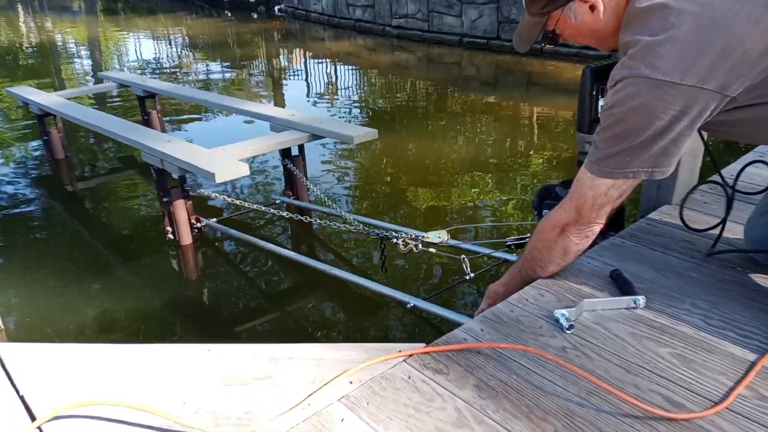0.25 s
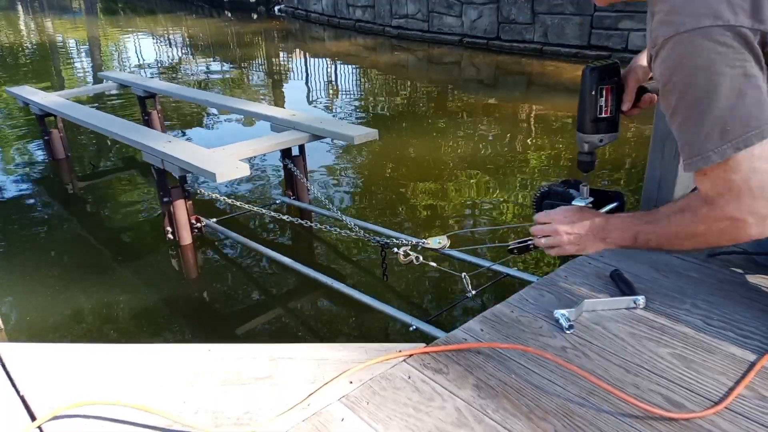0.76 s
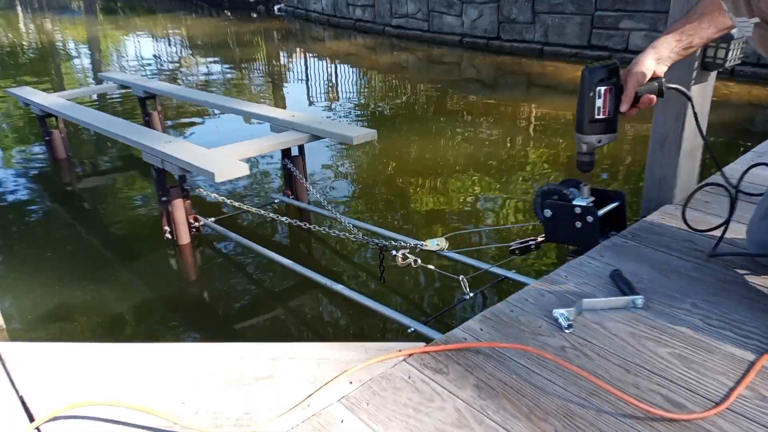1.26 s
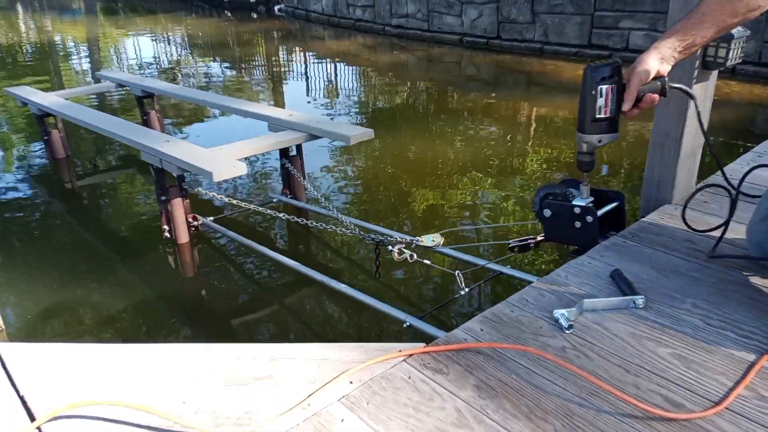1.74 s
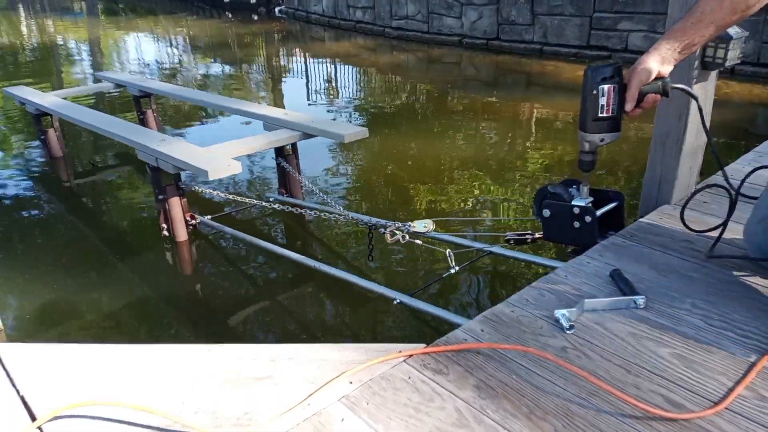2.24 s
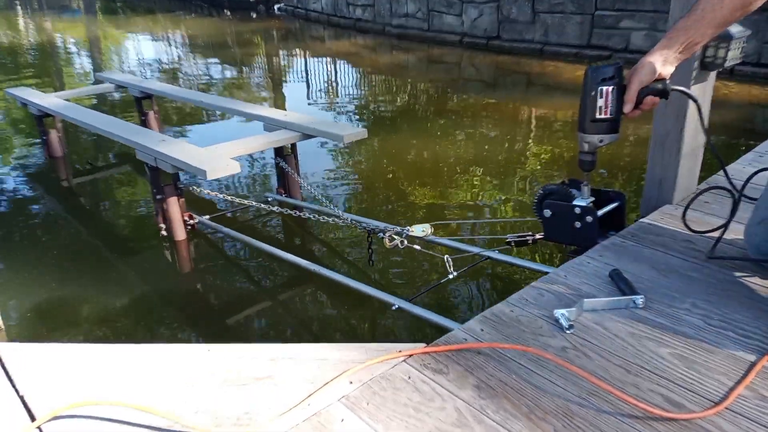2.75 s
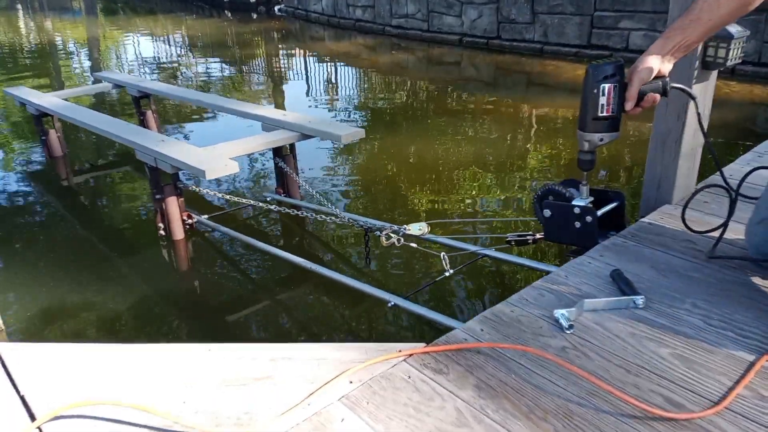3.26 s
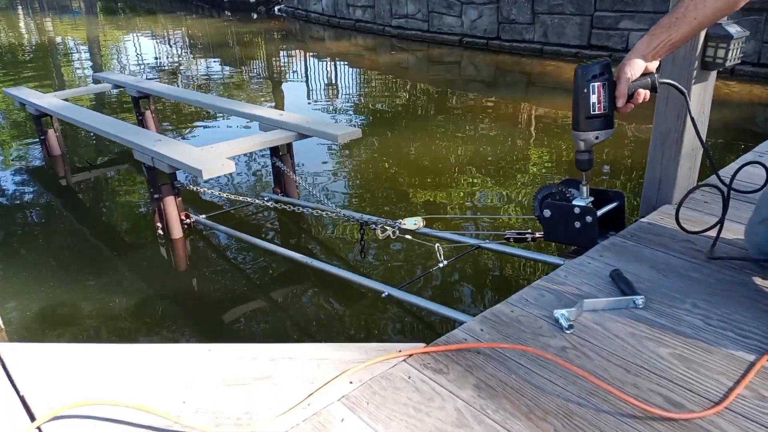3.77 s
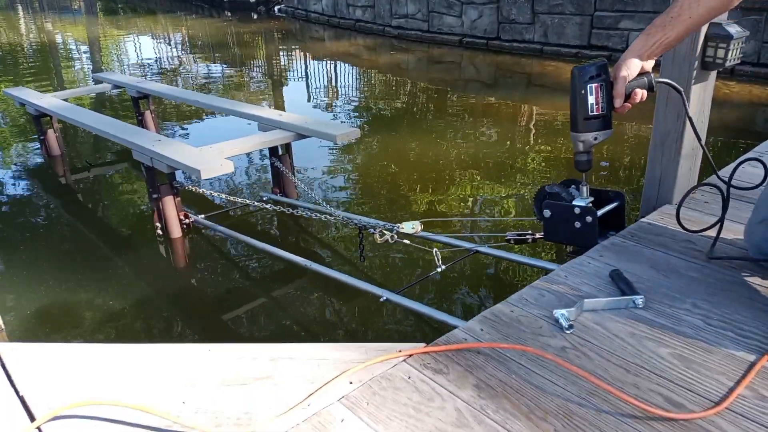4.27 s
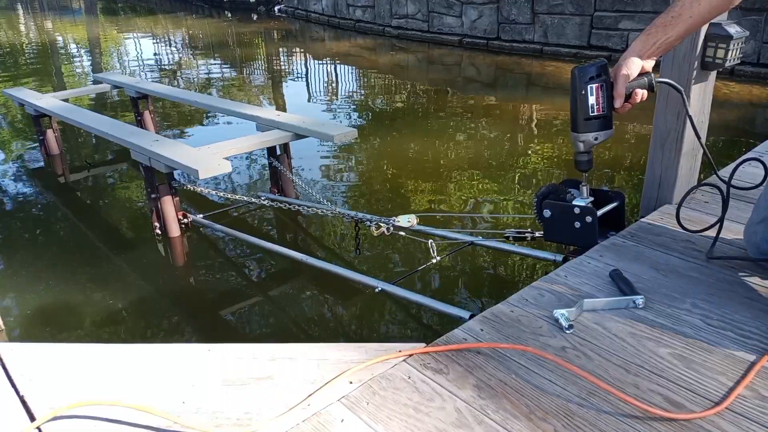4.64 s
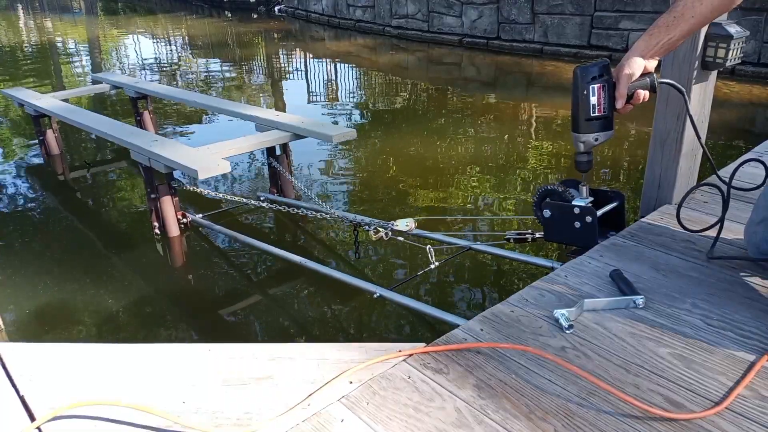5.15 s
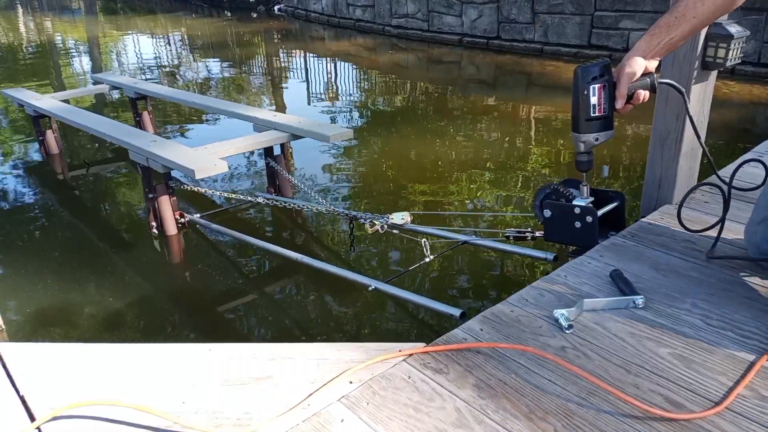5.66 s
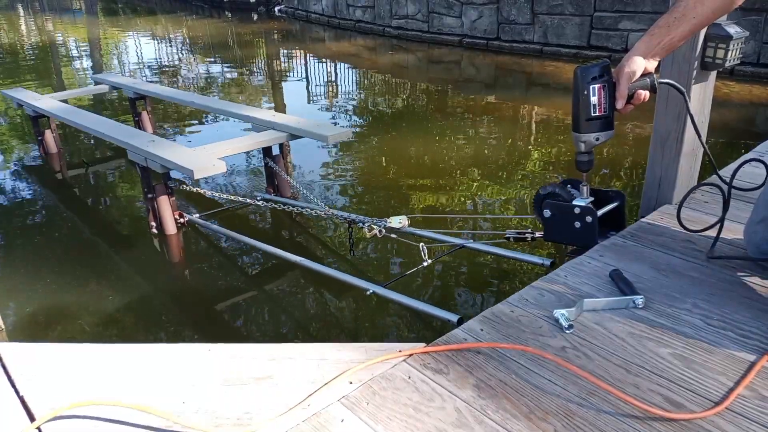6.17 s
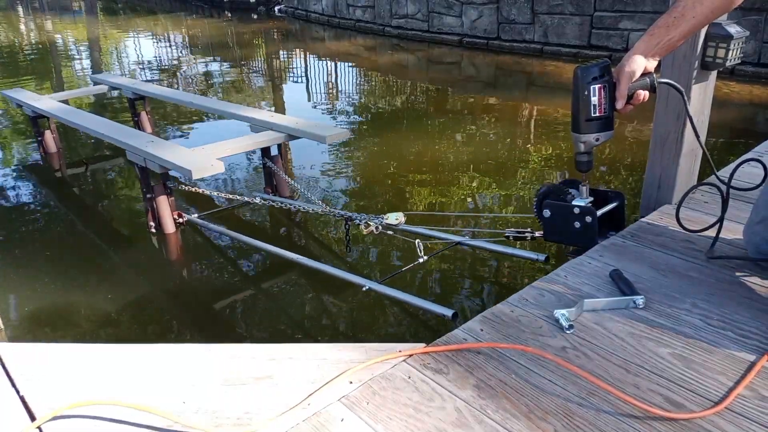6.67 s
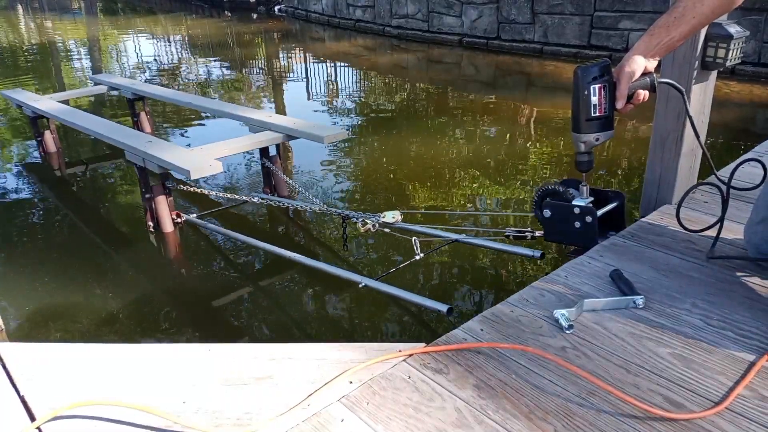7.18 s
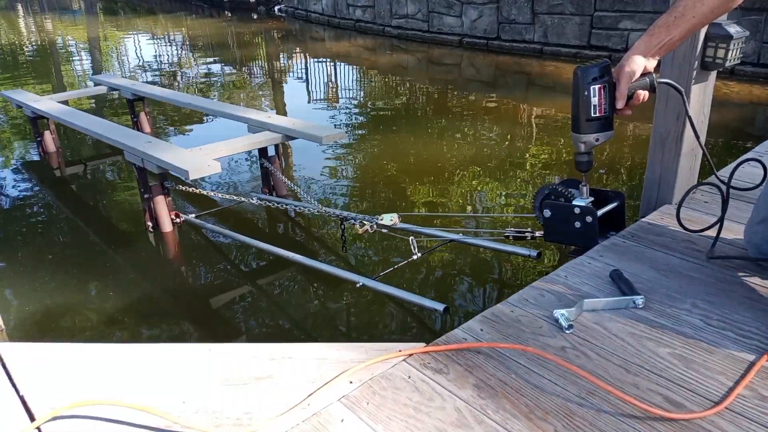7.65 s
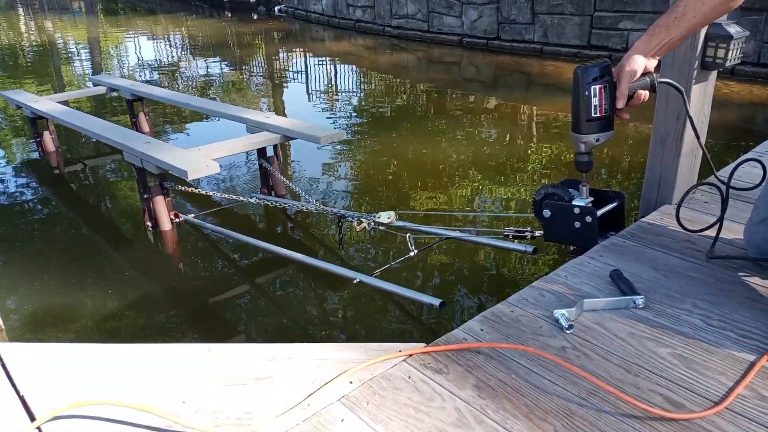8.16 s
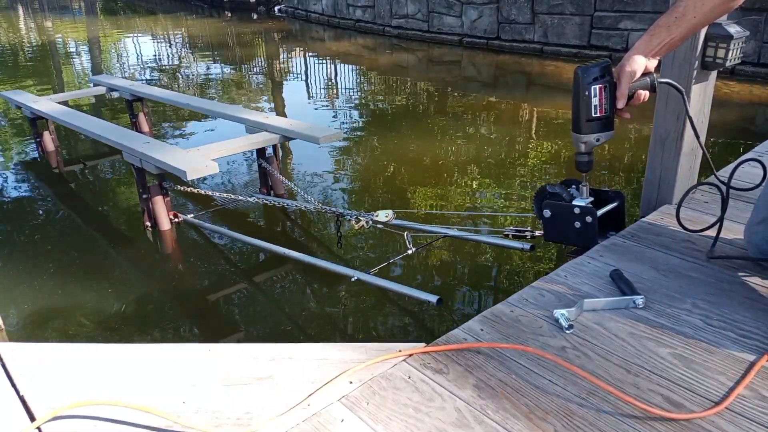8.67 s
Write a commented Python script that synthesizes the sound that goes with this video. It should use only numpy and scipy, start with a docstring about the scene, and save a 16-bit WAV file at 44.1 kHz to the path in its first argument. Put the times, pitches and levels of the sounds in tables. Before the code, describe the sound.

Close stereo sound of a corded electric drill turning a winch on a wooden dock. A thin, high whine rides on bright fan hiss, with low grinding rumble and gear chatter. After about three seconds the load eases, the whine rises slightly and the rumble lightens. Near the end the trigger is released, the motor glides down, and a few dull knocks sound in the boards.

```python
"""On a wooden dock a corded drill drives a winch, heard by two microphone ports.
The drill whines on multiples of its motor speed, over hiss made from noise shaped for each port.
Noise ringing the winch and boards, spindle tones and tooth chatter are strong at first, then light.
The trigger is released and the motor coasts down, with a few dull knocks.
A faint low hum and a soft background lie underneath."""
import sys
import numpy as np
from scipy import signal
from scipy.fft import rfft, irfft, next_fast_len
from scipy.io import wavfile
from scipy.ndimage import uniform_filter1d

SR = 44100
rng = np.random.default_rng(int(sys.argv[2]) if len(sys.argv) > 2 else 0)


def transcribe(u):
    """Save the signal u as a 16-bit wav file named by the first command-line argument.

    u: samples, shape (n,) or (channels, n), limited to [-1, 1]; the rate is SR.
    q: integer samples, one column per channel.
    """
    v = np.clip(np.atleast_2d(u).T, -1, 1)
    q = np.round(v * 32767).astype(np.int16)
    wavfile.write(sys.argv[1], SR, q)


N = 393362
T = np.arange(N) / SR  # time of every sample [s]

# Motor speed while the trigger is held: (time [s], speed [turns per s])
MOTOR_SPEED = [(0, 367), (.45, 363.6), (.62, 362.7), (.8, 362.4), (1.1, 368.6), (1.2, 372.8), (1.45, 376.6),
               (1.7, 378.4), (2.0, 376), (2.3, 374), (2.6, 370), (2.82, 368.7), (3.0, 370.8), (3.4, 387),
               (3.6, 390.8), (3.8, 393), (4.2, 394), (4.5, 392.8), (4.8, 393.9), (5.1, 393.9), (5.5, 392),
               (5.75, 391.9), (5.9, 393.4), (6.1, 392.9), (6.3, 393.3), (6.65, 391.8), (7.05, 391.9),
               (7.3, 390.4), (7.56, 389.7)]
# Strength of the fan blade tone: (time [s], level [dB])
BLADE_LEVEL = [(0, -39), (.55, -38.5), (.7, -35.5), (.82, -39), (1.0, -39), (1.12, -34.5), (1.5, -32.5),
               (2.1, -32.5), (2.32, -37), (2.75, -33.5), (3.0, -35), (3.32, -30.5), (4.2, -29.5), (5, -31),
               (5.3, -29.5), (5.9, -31.5), (6.7, -31), (7, -33), (7.35, -30.5), (7.56, -31)]
# Powered tones on multiples of the motor speed, against the blade tone:
# (multiple [-], left level [dB], right level [dB], change under full load [dB])
POWERED_TONES = [(1, -36, -36, 0), (6, -31, -37, 0), (8, -25, -29, 0), (12, -23, -30, 2),
                 (14, -14, -29, -7), (15, 0, -13, 0), (30, -28, -24, 0)]
# Swelling of the second blade harmonic at the right port: (time [s], added level [dB])
RIGHT_OVERTONE = [(.5, 9), (1, 9), (1.4, 3), (1.8, 9), (2.6, 6), (3.4, 12), (4, 7), (4.3, 0), (5, -3),
                  (5.5, 0), (7.56, 3)]
# Tones while coasting: (multiple of motor speed [-], left level [dB], right level [dB],
# loudest time [s], loss one second away [dB])
COASTING_TONES = [(7, -58, -61, 7.7, 250), (7, -63, -63.5, 8.27, 45), (8, -61, -65, 7.95, 120),
                  (14, -62, -65, 8.3, 40), (15, -51, -54, 8.06, 140), (30, -57, -64, 8.25, 50)]
# Color of the air hiss at each port: (frequency [Hz], relative level [dB per Hz])
LEFT_HISS = [(300, -27), (800, -22), (1700, -14.5), (2000, -17.5), (2850, -15.5), (3150, -11.5),
             (3550, -13.5), (3750, -6.5), (4100, -10.5), (4700, -10.5), (4830, -12.5), (5500, -1.5),
             (6300, -5.5), (7050, 3), (8000, -6), (8600, -12.5), (9050, -8.5), (9800, -18.5), (10600, -19),
             (12300, -23.5), (14300, -18), (15500, -22)]
RIGHT_HISS = [(300, -33), (1000, -17.5), (1300, -20), (1700, -17.5), (2300, -20.5), (3150, -14),
              (3850, -15), (4300, -13), (4700, -15), (5400, -13), (5800, -14), (6500, -19.5), (6900, -6),
              (7600, -19.5), (8450, -8), (9300, -8.5), (10000, -3.5), (10500, -1.5), (11000, -7),
              (12200, -10), (12700, -15), (15500, -21.5)]
# How alike the two ports sound: (frequency [Hz], likeness [0-1])
PORT_LIKENESS = [(100, 0.85), (300, 0.82), (700, 0.5), (1500, 0.94), (3000, 0.83), (3700, 0.56),
                 (4500, 0.59), (7000, 0.03), (15000, 0.1)]
# Strain of the winch, then its light running: (time [s], rumble level [dB])
RUMBLE_LEVEL = [(0, -39.5), (.7, -40), (1.1, -41.5), (1.6, -41), (2.7, -38), (3.15, -40.5), (3.3, -47.5),
                (3.5, -50.5), (5.9, -50.5), (7.56, -49)]
# What winch and boards ring with: (frequency [Hz], basic width [Hz], relative level [dB])
BODY_MODES = [(175.2, 26, -7), (235.9, 19.4, -1), (252.5, 17.5, -0.5), (317.5, 34.5, -4.5), (342.4, 39, -8),
              (378, 30, -17), (572.8, 46, -5), (608.7, 42, -3.5), (655.7, 75, -2), (940, 270, -9.5)]
# Left lean of the upper body modes, turned over for the right: (frequency [Hz], level [dB])
BODY_LEAN = [(400, 0), (620, 0.5), (950, 3.5)]
# Low multiples of the spindle turn, felt as a thump: (multiple [-])
THUMP_ORDERS = [2, 3, 4, 5, 6, 7]
# Strength of each of those multiples: (relative level [dB])
THUMP_LEVELS = [-14, -5.5, 5, 10, -1, -2.5]
# Higher spindle multiples humming in the boards:
# (multiple [-], relative level loaded [dB], relative level running light [dB])
BOARD_TONES = [(8, -13, -16), (9, -3, -15), (10, -8, -13), (11, -9, -6), (12, 0, -2), (13, -2, -1),
               (14, -10, -16), (16, -7, -15), (17, -9, -13), (18, -8, -18), (20, -13, -20)]
# Single spindle multiples swell or sink: (multiple [-], center [s], half length [s], change [dB])
SPINDLE_SWELLS = [(3, .3, 1.0, 6), (4, .1, 0.63, -4), (4, 1.9, 1.0, 3.5), (4, 4.3, .9, -5),
                  (5, 1.5, 1.1, -2), (5, 2.5, .45, 3), (5, 6.7, 0.83, 4.5), (9, 0.22, .5, 5.5),
                  (9, 1.51, 0.32, 7.5), (9, 2.2, .35, -9), (9, 3.3, .15, 13), (6, .2, .6, 9),
                  (7, .4, .7, 7), (12, 0.14, .4, 3), (12, 7.2, 0.19, 9.5), (13, 8.3, .35, 10),
                  (16, 2.6, 0.36, 6.5), (18, 2.7, 0.31, 5)]
# Color of the gear tooth rattle: (frequency [Hz], left [dB per Hz], right [dB per Hz])
TEETH_COLOR = [(406, -4, -16), (834, 1.5, -2.5), (1390, -5, -4.5), (2780, -1.5, -5.5), (5700, 2.5, -1.5),
               (6760, 9, -9.5), (9700, -4, 2), (12700, -15, -4), (15500, -10, -23)]
# What a ticking tooth rings with: (frequency [Hz], width [Hz], left level [dB], right level [dB])
TICK_MODES = [(1714, 72, -10, -7.5), (3110, 110, -0.5, -11), (4470, 350, -2.5, -6), (9670, 210, -10, 8),
              (10900, 250, -20, 2), (12100, 300, -14, 3), (13400, 600, -10, 1)]
# Brief jolts through the boards: (time [s], half length [s], rumble change [dB], thump change [dB])
BOARD_JOLTS = [(3.1, 0.11, 0.5, 5), (5.277, 0.092, 1, 5), (5.64, .15, 0.5, 6), (6.073, 0.048, 6, 6),
               (6.714, 0.093, 1.5, 7), (7.05, 0.11, -2, 6), (7.628, 0.093, 4.5, 10), (7.857, .03, 3, 2),
               (8.2, 0.28, 0.5, 0)]
# Dull knocks in the boards: (time [s], level [dB])
BOARD_KNOCKS = [(7.609, -41), (8.056, -41), (8.288, -37.5), (8.299, -38), (8.676, -48)]
# Strength of the low hum: (time [s], level [dB])
HUM_LEVEL = [(0, -57), (4.3, -56), (4.8, -57), (5.8, -59), (6.4, -63), (7, -63), (7.5, -55), (8.92, -55.5)]
# Color of the soft background: (frequency [Hz], relative level [dB per Hz])
OUTDOOR_COLOR = [(33, -36), (48, 6), (80, 9.5), (150, 3), (500, -7), (1500, -32), (16000, -37)]

RELEASE_S = 7.56  # the trigger is let go
DRAG_PER_S = 0.635  # coasting loss in step with speed
FRICTION_TURNS = 60  # speed at which friction equals that drag [turns per s]
BLADES = 15  # fan blades
GEAR = 19.2  # motor turns to one spindle turn
LAG = 6.4  # delay of the right port [samples]
AIR_DB, AIR_LOADED_DB = -29, -1.26  # hiss running free, change at full strain
FLICKER_DB, FLICKER_LOADED_DB = 0.2, 1  # hiss flicker, added flicker at full strain
THUMP_DB, CHATTER_DB = -9, 6  # against the rumble
UPPER_HZ, UPPER_LOADED_DB = 450, 2  # body modes above this gain under load
# dB lost for each dB of slowing; the board tones and upper modes lose theirs on top of the rumble's
AIR_SPEED_LAW, RUMBLE_SPEED_LAW, THUMP_SPEED_LAW = 1.87, 0.99, 2.2
BOARD_TONE_SPEED_LAW, UPPER_SPEED_LAW = 6.5, 0.39
KNOCK_DAMPING = 2.2  # ring width of a knock against the basic width
KNOCK_DULL_DB, KNOCK_RISE_S = -7, 0.004  # change per octave, rise time
HUM_HZ, HUM_WANDER_HZ = 129.2, 3.2  # pitch, upper rate of its wandering
OUTDOORS_DB = -59
EDGE_HZ = 15760  # upper band limit


def armature():
    """Motor speed under power, then slowed by drag and friction; also the slowing in dB."""
    powered = uniform_filter1d(curves(MOTOR_SPEED)[0], size=3500, mode="nearest")
    kept = np.exp(-DRAG_PER_S * np.maximum(T - RELEASE_S, 0))
    speed = (powered + FRICTION_TURNS) * kept - FRICTION_TURNS
    return speed, 20 * np.log10(speed / powered)


def whine(speed):
    """Fan blades, commutator and imbalance sing on multiples of the motor turn."""
    turns = np.cumsum(speed * (1 + 0.00025 * drift(hz=30))) / SR
    turns = np.array([turns, turns - speed * LAG / SR])  # the right port trails
    return np.sqrt(2) * (powered_tones(turns) + coasting_tones(turns))


def powered_tones(turns):
    """Tones under power waver with chance and the spindle turn, then collapse after release."""
    # the operator's body shields the drill, then moves aside
    blade_db = curves(BLADE_LEVEL)[0] + ramp(0.3, 0.49, 23) - 23
    blade_db += ramp(7.625, 7.74, -48)
    spindle_db = 0.55 * np.cos(2 * np.pi * turns / GEAR)
    out = np.zeros((2, N))
    for order, left_db, right_db, loaded_db in POWERED_TONES:
        side_db = np.array([left_db + 0 * T, right_db + 0 * T])
        if order == 2 * BLADES:
            side_db[1] += curves(RIGHT_OVERTONE)[0]
        waver_db = 0.88 * drift(hz=15.4) + spindle_db
        if order != BLADES:
            # the weaker tones waver more and drop at once on release
            waver_db = waver_db + 2.5 * drift(hz=2.5) + ramp(7.56, 7.62, -10)
        level_db = blade_db + side_db + loaded_db * strain() ** 2 + waver_db
        out += amp(level_db) * np.sin(2 * np.pi * order * turns)
    return out


def coasting_tones(turns):
    """A thinner set of tones glides down with the slowing motor, each loudest at its own time."""
    loose = np.clip((T - RELEASE_S) / 0.13, 0, 1)
    out = np.zeros((2, N))
    for order, left_db, right_db, loudest, loss_db in COASTING_TONES:
        level_db = np.array([[left_db], [right_db]]) - loss_db * (T - loudest) ** 2
        level_db = level_db + 2.8 * drift(hz=12)
        out += loose * amp(level_db) * np.sin(2 * np.pi * order * turns)
    return out


def air(slowed_db):
    """Turbulent hiss from the fan, drifting in patches of time and pitch."""
    hiss = ports(*rng.standard_normal((2, N)), LEFT_HISS, RIGHT_HISS)
    z = signal.stft(hiss, nperseg=512, noverlap=384)[2]
    patches = uniform_filter1d(rng.standard_normal(z.shape[1:]), size=12, axis=0)
    patches = evened(uniform_filter1d(patches, size=14, axis=1))
    hiss = signal.istft(z * amp(1.08 * patches), nperseg=512, noverlap=384)[1][:, :N]
    level_db = AIR_DB + AIR_LOADED_DB * strain() + AIR_SPEED_LAW * slowed_db
    level_db += ramp(0.37, 0.81, 8.5) - 8.5  # the operator's body moves aside
    level_db += (FLICKER_DB + FLICKER_LOADED_DB * strain() ** 2) * drift(hz=45)
    level_db += ramp(7.55, 7.8, -1.1)  # lost as the power goes
    return amp(level_db) * evened(hiss)


def winch(speed, slowed_db):
    """The spindle, geared down from the motor, shakes winch and boards and rattles the teeth."""
    chatter_db, rumble_db, thump_db = shaking(slowed_db)
    spindle = np.cumsum(speed * (1 + 0.0027 * drift(hz=7.2))) / SR / GEAR
    body = grinding(spindle, slowed_db)
    body = body + amp(-4 + BOARD_TONE_SPEED_LAW * slowed_db) * board_hum(spindle)
    out = amp(rumble_db) * body + amp(thump_db) * thump(spindle)
    return out + amp(chatter_db) * chatter(spindle)


def strain():
    """Load on the winch, 0.3 light to 1 heavy, read from how hard it rumbles."""
    return np.clip((curves(RUMBLE_LEVEL)[0] + 54) / 14, 0.3, 1)


def shaking(slowed_db):
    """Levels of chatter, rumble and thump, from the strain, jolts, slow chance and coast down."""
    jolts = sum(np.outer(changes_db, np.exp(-((T - s) / length) ** 2))
                for s, length, *changes_db in BOARD_JOLTS)
    rumble_db = curves(RUMBLE_LEVEL)[0]
    steady_db = rumble_db + RUMBLE_SPEED_LAW * slowed_db
    thump_db = rumble_db + THUMP_DB + jolts[1] + THUMP_SPEED_LAW * slowed_db + 1.1 * drift(hz=3)
    return steady_db + CHATTER_DB, steady_db + jolts[0], thump_db


def grinding(spindle, slowed_db):
    """Noise that swells once a spindle turn rings the body modes of winch and boards."""
    grind_db = 0.33 * drift(hz=7.7) + 1.5 * strain() * drift(hz=35)
    grind_db += 0.98 * np.cos(2 * np.pi * spindle)
    grind = amp(grind_db) * rng.standard_normal((2, N))
    upper_db = UPPER_LOADED_DB * (strain() - 0.5) + UPPER_SPEED_LAW * slowed_db
    rung = np.zeros((2, N))
    for hz, width, db in BODY_MODES:
        wide = 1.33 * width  # two passes narrow the ring again
        ring = resonate(resonate(grind, hz, wide), hz, wide) / np.sqrt(width)
        rung += amp(db + (hz > UPPER_HZ) * upper_db) * ring
    return ports(*rung, BODY_LEAN, np.array(BODY_LEAN) * [1, -1])


def board_hum(spindle):
    """The boards hum on higher spindle multiples, whose balance follows the load."""
    heavy = (strain() - 0.3) / 0.7
    levels_db = [light_db + (loaded_db - light_db) * heavy for _, loaded_db, light_db in BOARD_TONES]
    return wobble(spindle, np.array(BOARD_TONES)[:, 0], levels_db, waver_db=2.2)


def thump(spindle):
    """The spindle wobble thumps on its low multiples, a little stronger at the right port."""
    return wobble(spindle, THUMP_ORDERS, THUMP_LEVELS, waver_db=1.5) * amp([[-0.8], [0.8]])


def wobble(spindle, orders, levels_db, waver_db):
    """Tones on multiples of the spindle turn, each swelling in its own time."""
    out = np.zeros(N)
    for order, level_db in zip(orders, levels_db):
        swell_db = sum(db * np.exp(-((T - s) / length) ** 2)
                       for k, s, length, db in SPINDLE_SWELLS if k == order)
        tone = np.sin(2 * np.pi * (order * spindle + rng.random()))
        out += amp(level_db + swell_db + waver_db * drift(hz=3.4)) * tone
    return evened(out)


def chatter(spindle):
    """Gear teeth rattle in a strong and a weaker burst each spindle turn, with single ticks."""
    burst = amp(0.8 * np.cos(4 * np.pi * spindle) + 1.3 * np.cos(2 * np.pi * spindle))
    rattle = burst * amp(1.5 * drift(hz=300)) * rng.standard_normal((2, N))
    color = np.array(TEETH_COLOR)
    return ports(*rattle, color[:, [0, 1]], color[:, [0, 2]]) + 0.36 * ticks(burst)


def ticks(burst):
    """Single teeth strike at random, most often in the bursts, each ringing one mode."""
    strikes = rng.random(N) < 450 * burst ** 2 / SR
    hit = amp(3 * np.minimum(rng.exponential(1, N), 4)) * strikes
    mode = rng.integers(0, len(TICK_MODES), N)
    out = np.zeros((2, N))
    for k, (hz, width, left_db, right_db) in enumerate(TICK_MODES):
        ring = resonate(hit * (mode == k), hz, width) / np.sqrt(width)
        out += amp([[left_db], [right_db]]) * ring
    return evened(np.array([out[0], np.roll(out[1], round(LAG))]))


def knocks():
    """Each knock rings the body modes briefly and dully."""
    t = T[:SR // 10]
    ring = np.zeros(len(t))
    for hz, width, db in BODY_MODES:
        fade = np.exp(-np.pi * KNOCK_DAMPING * width * t)
        ring += amp(db + KNOCK_DULL_DB * np.log2(hz)) * fade * np.sin(2 * np.pi * hz * t)
    ring *= np.minimum(t / KNOCK_RISE_S, 1)
    s, db = np.transpose(BOARD_KNOCKS)
    blows = np.zeros(N)
    blows[np.round(s * SR).astype(int)] = amp(db)
    return signal.oaconvolve(blows, ring / abs(ring).max())[:N]


def outdoors():
    """A low hum, a slightly wandering tone, sinks and returns over soft wide noise."""
    turns = np.cumsum(HUM_HZ + 0.15 * drift(hz=HUM_WANDER_HZ)) / SR
    level_db = curves(HUM_LEVEL)[0] + 0.67 * drift(hz=HUM_WANDER_HZ)
    hum = np.sqrt(2) * np.sin(2 * np.pi * turns) * amp(level_db)
    background = ports(*rng.standard_normal((2, N)), OUTDOOR_COLOR, OUTDOOR_COLOR)
    return hum + amp(OUTDOORS_DB) * background


def ports(x, other, left, right):
    """The right port hears x later, blended with an unrelated sound of the same kind."""
    size = next_fast_len(N)
    hz = np.fft.rfftfreq(size, 1 / SR)
    alike = np.clip(read(PORT_LIKENESS, hz), 0, 1)
    a, b = rfft(x, size), rfft(other, size)
    late = a * np.exp(-2j * np.pi * hz * LAG / SR)
    b = alike * late + np.sqrt(1 - alike ** 2) * b
    both = np.array([a * amp(read(left, hz)), b * amp(read(right, hz))])
    return evened(irfft(both, size)[:, :N])


def resonate(x, hz, width):
    """A fixed resonance of gain 1; a greater width dies away sooner."""
    r = np.exp(-np.pi * width / SR)
    return 2 * signal.lfilter([1 - r], [1, -r * np.exp(2j * np.pi * hz / SR)], x).real


def drift(hz):
    """Slow chance: noise kept below hz, scaled to rms 1."""
    low = signal.butter(2, hz, fs=SR, output="sos")
    return evened(signal.sosfilt(low, rng.standard_normal(N)))


def ramp(start, end, db):
    """0 dB before start, a straight slope, then db after end."""
    return db * np.clip((T - start) / (end - start), 0, 1)


def curves(rows):
    """Joins the rows of a table by straight lines: one value per sample for each column."""
    s, *columns = np.transpose(rows)
    return [np.interp(T, s, c) for c in columns]


def read(points, hz):
    """Reads a spectrum on a log-frequency axis."""
    f, value = np.transpose(points)
    return np.interp(np.log(hz + 1), np.log(f + 1), value)


def evened(x):
    """Scales to rms 1."""
    return x / np.sqrt(np.mean(x ** 2) + 1e-20)


def amp(db):
    """Turns decibels into gain."""
    return 10 ** (np.asarray(db) / 20)


def scene():
    """Adds drill, winch, knocks and background."""
    speed, slowed_db = armature()
    drill = whine(speed) + air(slowed_db)
    return drill + winch(speed, slowed_db) + knocks() + outdoors()


def record(dry):
    """Removes everything above the band limit with a steep filter."""
    low_pass = signal.firwin(2047, EDGE_HZ, window=("kaiser", 9), fs=SR)
    return signal.oaconvolve(dry, low_pass[None], "same")


dry = scene()
out = record(dry)
transcribe(out)
```